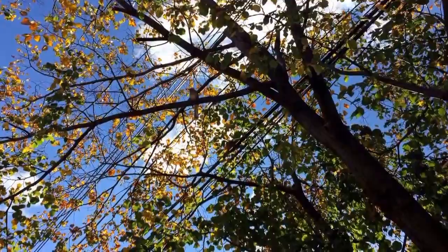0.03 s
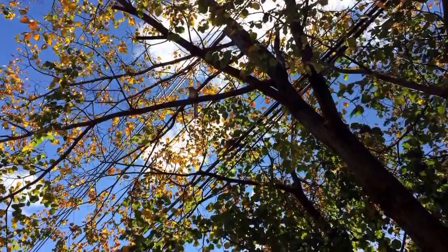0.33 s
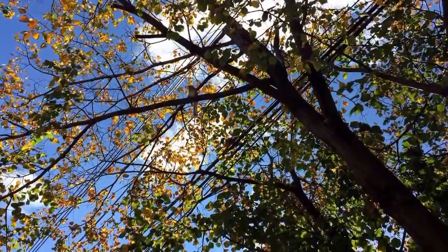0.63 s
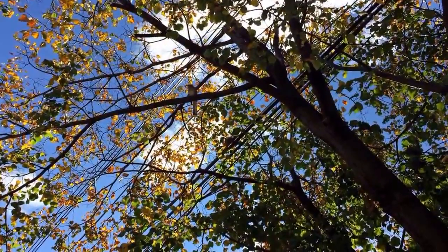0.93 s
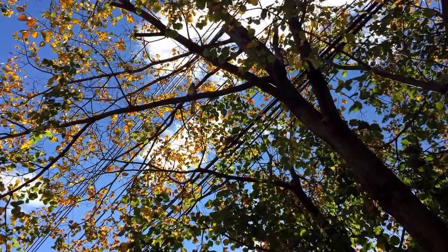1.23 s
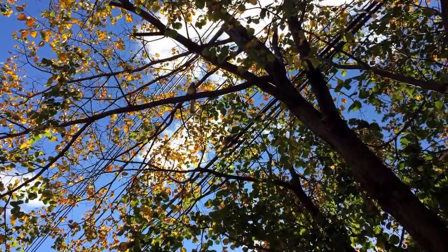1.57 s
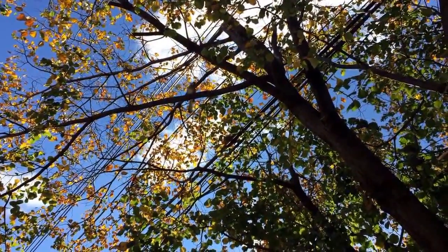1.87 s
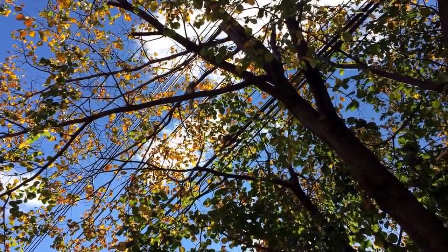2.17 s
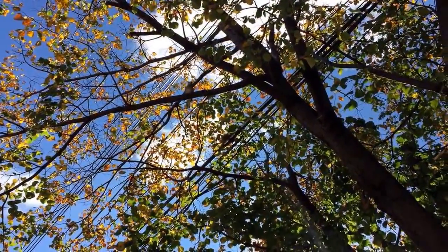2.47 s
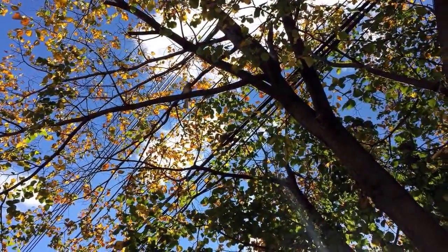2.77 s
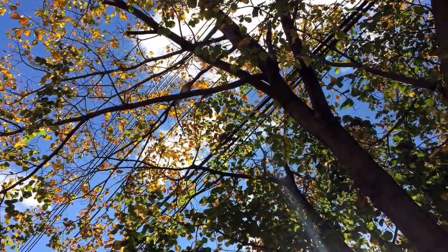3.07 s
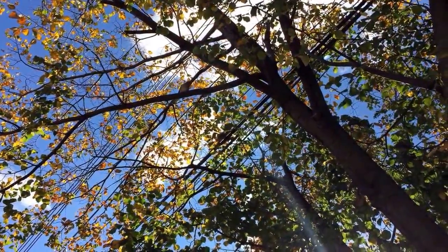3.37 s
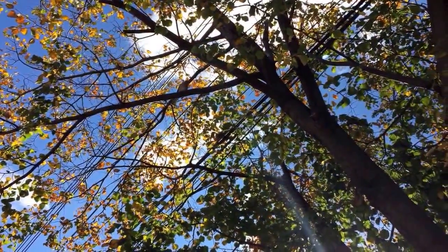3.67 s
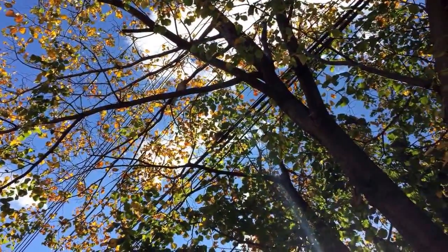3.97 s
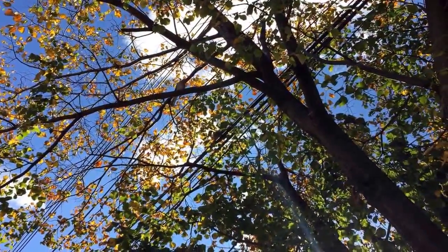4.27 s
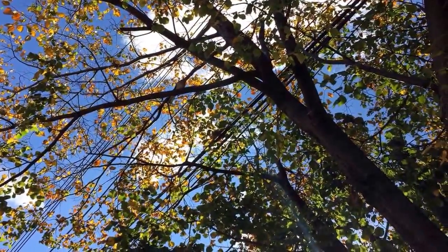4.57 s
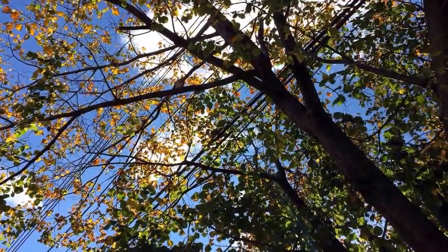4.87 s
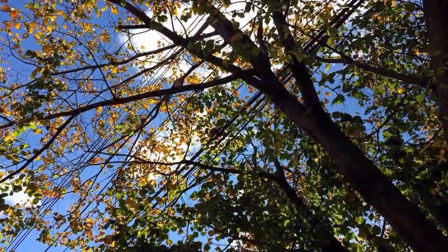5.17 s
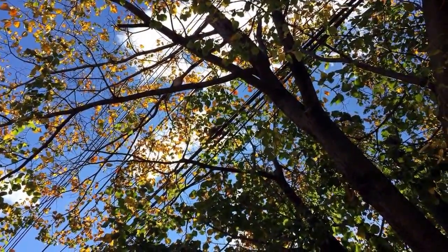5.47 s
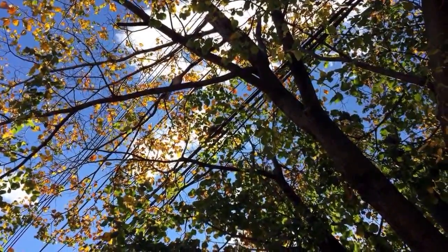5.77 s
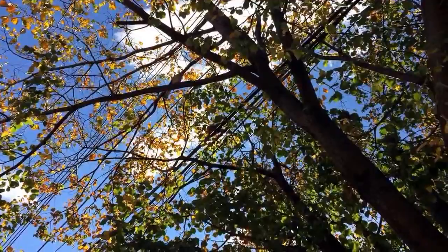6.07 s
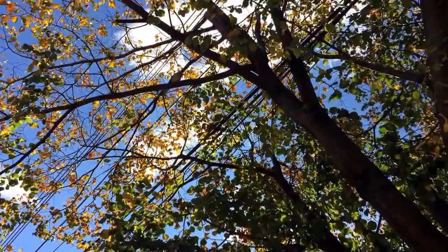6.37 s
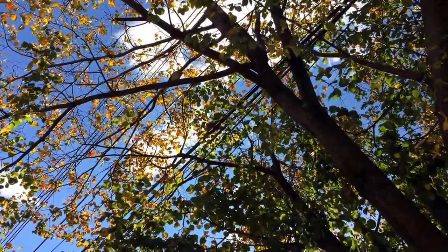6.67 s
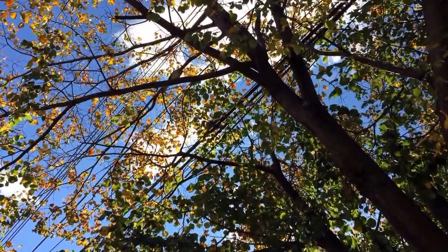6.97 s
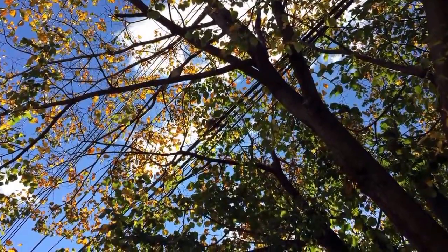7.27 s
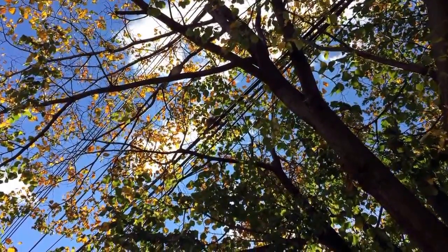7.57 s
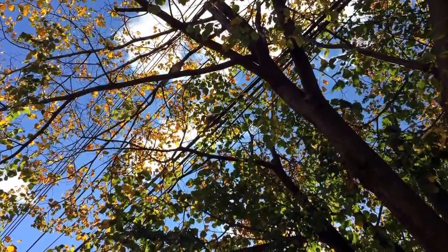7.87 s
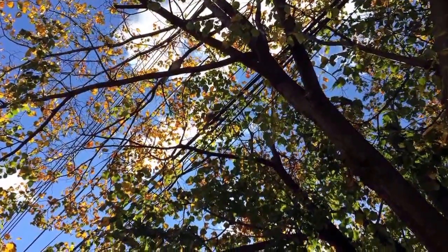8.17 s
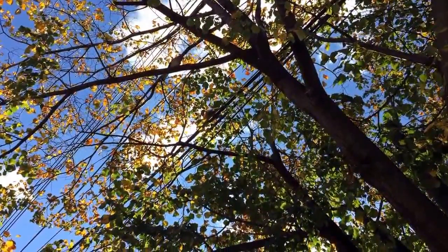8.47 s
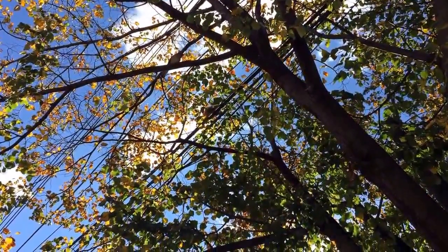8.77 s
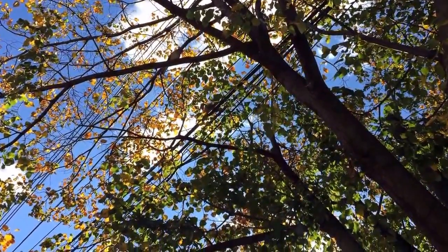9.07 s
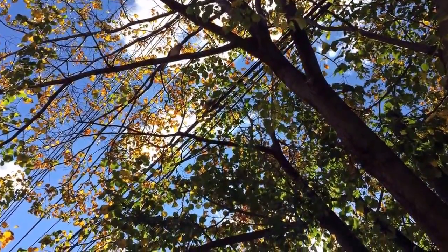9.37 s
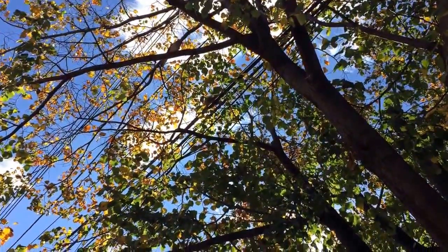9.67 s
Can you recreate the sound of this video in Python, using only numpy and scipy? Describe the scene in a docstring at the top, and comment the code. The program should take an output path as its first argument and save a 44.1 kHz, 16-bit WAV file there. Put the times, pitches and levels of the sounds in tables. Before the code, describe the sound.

On a city street, a vehicle accelerates away with a low hum and a rush of tyres while small songbirds chatter in the branches near the microphone. The chirps start busy, thin to single calls, then turn briefly nasal and end in a quick run. The engine shifts gear about halfway and sinks into soft traffic, where another motor swells faintly. The bright calls stay in front, echoing lightly off the houses.

```python
"""A city street, with small birds chattering in a tree. Their syrinx membranes glide through quick
whistles with thin bright overtones and scratchy catches, then a few nasal calls and a last flurry.
Branches scatter the calls and house fronts echo them. On the road an engine pulls away, its exhaust
humming at the firing rate, changes gear and fades into a bed of traffic; a second drones further off."""
import sys
import numpy as np
from scipy import signal
from scipy.fft import rfft, irfft, next_fast_len
from scipy.io import wavfile
from scipy.ndimage import uniform_filter1d, map_coordinates

SR = 44100
rng = np.random.default_rng(int(sys.argv[2]) if len(sys.argv) > 2 else 0)


def inscribe(sig):
    """Save sig as 16-bit PCM at rate SR to the path in sys.argv[1].

    A 1-D sig is mono; a 2-D sig holds one channel per row.
    Samples are clipped to [-1, 1] before scaling.
    """
    pcm = np.round(np.clip(np.atleast_2d(sig).T, -1, 1) * 32767)
    wavfile.write(sys.argv[1], SR, pcm.astype(np.int16))


N = 437031

# Table levels are set before each layer's trim.
# faders of the traffic bed: (time [s], rumble [dB], roar [dB], tyres [dB])
ROAD_FADERS = [(0, -55, -42, -38.5), (.66, -54.5, -40, -39), (2.12, -54, -51.5, -46.5),
               (4.91, -57.5, -53, -50), (6.12, -55.5, -53.5, -48.5), (8.46, -55.5, -55.5, -49.5),
               (9.9, -57, -54, -50)]
# tone of the city rumble, road roar and tyre noise: (frequency [Hz], level [dB])
RUMBLE_EQ = [(24, -26.5), (40, -12.5), (60, -1), (78, -1), (105, -5.5), (145, -3.5), (175, -9.5),
             (210, -6.5), (250, -12), (330, -19.5)]
ROAR_EQ = [(150, 1), (250, 1), (320, 0.5), (420, -1.5), (480, -5.5), (680, -2), (800, -13.5), (1100, -31.5)]
TYRE_EQ = [(500, -24.5), (750, 1), (950, 1), (1100, 3), (1280, 1), (1700, -0.5), (2500, -8.5), (3200, -20),
           (4300, -25.5), (5000, -39.5), (6800, -37), (8000, -54.5), (11000, -54.5), (15500, -47)]
# resonances of the departing vehicle's whirr: (frequency [Hz], width [Hz], level [dB])
WHIRR_MODES = [(437, 47, 1), (641, 31, 2), (709, 19, 4), (878, 27, 7.5), (955, 27, 5.5), (1259, 20, 6)]
# how hard it is driven: (time [s], whirr against the roar fader [dB])
ENGINE_LOAD = [(0, -1.5), (4.9, 2), (5.4, -25), (9.9, -3.5)]
# its revs climb, drop at the gear change and ease off: (time [s], firing rate [Hz])
ENGINE_REVS = [(0, 94), (.6, 106.7), (1.9, 117.6), (3.1, 126.8), (4.9, 137.4), (5.15, 135.4), (5.4, 108.1),
               (5.7, 102.2), (6.4, 99.8), (6.95, 86), (7.5, 95.7), (9.9, 89.7)]
# its exhaust faders: (time [s], firing tone [dB], overtones [dB])
ENGINE_FADERS = [(0, -36, -31), (.3, -28, -29.5), (.55, -27, -37.5), (.7, -32.5, -36.5), (1.5, -33, -36),
                 (2.1, -32.5, -44), (2.35, -41.5, -41.5), (3, -38.5, -52), (3.6, -35.5, -64),
                 (4.1, -39, -64), (5.05, -40.5, -65), (5.3, -42, -59), (5.62, -38.5, -50),
                 (6.2, -42, -53.5), (6.8, -40, -62), (7.15, -54, -59), (7.45, -45.5, -59),
                 (8.2, -59, -59.5), (9.9, -55.5, -56)]
# brief dips in the firing tone: (time [s], width [s], depth [dB])
FIRING_DIPS = [(1.35, 0.1, 13), (2.28, .04, 5.5), (2.78, 0.12, 15), (3.83, 0.076, 17)]
# exhaust overtones: (multiple of the firing rate, level [dB])
EXHAUST_ORDERS = [(.5, -26.5), (1.5, -1.5), (2, 0.5), (2.5, -10), (3, -16.5), (3.5, -25.5), (4, -19)]
# a second engine down the road: (time [s], firing rate [Hz], level [dB])
FAR_ENGINE = [(0, 60, -61), (3.5, 66, -54.5), (5.2, 71, -42.5), (5.8, 73, -44.5), (6.2, 75, -51),
              (7.2, 118, -62), (7.6, 130, -46.5), (8.1, 141, -47), (8.5, 143, -63), (9.9, 148, -53)]
# tone of the shrill overtones, bright near 6.7, 11.3 and 15.5 kHz with dips between:
# (frequency [Hz], gain [dB])
SHRILL_EQ = [(5200, -3.5), (6700, -3), (7800, -30), (9000, -13), (10200, -18.5), (11300, 3), (13500, -15.5),
             (14600, -3.5), (15500, 1)]
# tone of the husk under a note and of a catch's rasp: (frequency [Hz], level [dB])
HUSK_EQ = [(1800, -1.5), (2400, 11.5), (3000, 4), (4400, -4), (5500, -15), (7000, -16.5), (10000, -35),
           (15500, -26)]
RASP_EQ = [(1700, -22), (2300, 2), (3000, 8), (4400, -1.5), (5200, -15.5), (6700, -11.5), (8000, -19.5),
           (9000, -18.5), (10200, -34.5), (11500, -14), (13500, -21), (15500, -15)]
# texture of the calls: (time [s], hoarseness [dB], send to the branches [dB])
CALL_TEXTURE = [(0, -26, -7), (.85, -20, -4.5), (1.2, -34.5, -10), (4.5, -30, -5.5), (6.4, -33, -3.5),
                (7.8, -23.5, -0.5), (8.45, -16, -5.5), (9.1, -16, -5)]
# scooped and arched whistles: (start [s], length [s], first pitch [Hz], middle pitch [Hz],
# last pitch [Hz], level [dB], shrill overtones [dB], catch [dB])
BENT_NOTES = [(0.023, 0.039, 2410, 2680, 2360, -32, -20.5, -48),
              (0.25, .057, 2560, 2563, 3030, -31, -27, -39),
              (0.526, 0.089, 3510, 3196, 3410, -29, -30, -29),
              (0.624, 0.048, 2120, 2350, 2190, -27.5, -35.5, -44),
              (1.615, .05, 3020, 2880, 3140, -33, -27, -36),
              (1.703, 0.038, 2030, 1943, 2000, -29, -45, -50),
              (2.004, 0.058, 2760, 2310, 2470, -32, -43.5, -46),
              (5.926, 0.0405, 2043, 2290, 2290, -31.5, -34, -42),
              (8.432, 0.034, 3110, 3330, 4020, -34.5, -34, -35),
              (8.451, .022, 2400, 2880, 2390, -25, -47, -41)]
# whistles that slide and settle:
# (start [s], length [s], first pitch [Hz], last pitch [Hz], level [dB], shrill overtones [dB])
SLURRED_NOTES = [(0.23, 0.019, 2990, 2160, -30.5, -34), (0.318, 0.021, 2720, 2140, -26.5, -31),
                 (0.351, 0.025, 2790, 2350, -25.5, -27), (0.51, 0.015, 4460, 3410, -38, -36),
                 (.796, 0.017, 3490, 2910, -30.5, -29), (.824, 0.045, 3570, 2730, -31.5, -42),
                 (0.829, 0.039, 3970, 3650, -44, -37), (.869, 0.028, 2680, 2230, -31.5, -46),
                 (0.919, 0.026, 2560, 2503, -24, -39), (1.078, 0.021, 3500, 2327, -23.5, -39),
                 (1.104, .046, 2980, 2520, -24.5, -47), (1.664, 0.036, 2845, 2040, -29.5, -39),
                 (1.743, 0.097, 2044, 2327, -30, -42), (1.977, .025, 3290, 2830, -30, -34),
                 (2.35, 0.056, 3090, 3145, -32.5, -40), (2.399, 0.074, 2290, 1920, -35, -44),
                 (3.008, 0.042, 3080, 3145, -37, -35), (3.262, .031, 3420, 2500, -39.5, -40),
                 (3.527, 0.033, 3270, 2830, -32, -31.5), (4.363, 0.022, 3020, 2510, -41, -37),
                 (4.593, 0.025, 3810, 2610, -37, -37), (5.034, 0.019, 2970, 2610, -38.5, -38),
                 (5.276, 0.021, 3360, 2630, -34, -36), (5.594, 0.025, 2695, 2585, -39, -33),
                 (5.908, 0.022, 2820, 2560, -47, -35), (5.963, .042, 2367, 1972, -27.5, -33),
                 (7.388, 0.015, 2930, 2860, -28, -37), (7.781, 0.029, 2780, 2313, -30.5, -39)]
# calls that shoot up and drop back: (peak time [s], rise [s], fall [s], peak pitch [Hz],
# low pitch [Hz], rise level [dB], fall level [dB], shrill overtone level [dB])
PEAKED_NOTES = [(3.069, 0.033, 0.063, 2574, 1840, -37, -36, -77),
                (3.324, 0.024, 0.027, 2276, 1865, -34, -30.5, -75),
                (3.591, 0.026, 0.046, 3160, 1937, -31.5, -30.5, -64),
                (4.419, .026, 0.052, 2570, 1803, -28, -40, -70),
                (4.671, 0.034, 0.028, 2927, 1830, -27.5, -33.5, -58.5),
                (5.092, .022, 0.048, 2264, 1808, -29, -33.5, -60),
                (5.333, 0.022, 0.052, 2390, 1803, -30, -32.5, -63),
                (5.66, 0.029, 0.045, 2590, 1770, -28, -39, -60.5)]
# low notes that break into a high slur: (break time [s], low length [s], low pitch [Hz],
# low level [dB], slur length [s], first pitch [Hz], last pitch [Hz], slur level [dB])
YODEL_NOTES = [(6.348, 0.057, 2155, -31.5, 0.035, 3070, 2386, -28),
               (6.499, 0.034, 2204, -35.5, 0.058, 2910, 2642, -30.5),
               (6.864, .059, 2165, -34, 0.043, 2735, 2502, -33),
               (7.146, 0.069, 2117, -34, 0.051, 2550, 2417, -32.5)]
# wavering nasal calls: (start [s], length [s], first pitch [Hz], pitch at one third [Hz],
# pitch at two thirds [Hz], last pitch [Hz], level [dB], octave overtone [dB])
NASAL_NOTES = [(7.31, 0.084, 1957, 2150, 2330, 1970, -40, -3),
               (7.472, 0.11, 2210, 2310, 2190, 2340, -39.5, -3),
               (7.698, .078, 2010, 2020, 2040, 2060, -37, -17)]
# the flurry's chips:
# (peak time [s], peak pitch [Hz], low pitch [Hz], level [dB], after-note delay [s], after-note [dB])
FLURRY_CHIPS = [(8.58, 3750, 2023, -32, .025, -36), (8.684, 3364, 1940, -32.5, 0.032, -31.5),
                (8.796, 3050, 1970, -32, 0.032, -34.5), (8.908, 3570, 2205, -31, .03, -27.5),
                (9.022, 4100, 2046, -34, 0.027, -31.5)]
# reverb between the house fronts: (frequency [Hz], time to decay by 60 dB [s])
STREET_DECAY = [(500, 0.68), (2500, 0.54), (4500, 0.47), (12000, 0.69)]

SETTLE_S = .029  # time constant of a slur's glide


def amp(db):
    """Decibels to gain."""
    return 10 ** (np.asarray(db) / 20)


def unit(x):
    """Scale to rms 1."""
    return x / np.sqrt(np.mean(x ** 2) + 1e-20)


def along(points, hz):
    """Read (frequency [Hz], value) points on a log axis."""
    freqs, values = np.transpose(points)
    return np.interp(np.log(hz + 1), np.log(freqs + 1), values)


def automation(rows):
    """One lane, a value per sample, for each column after the time."""
    times, *columns = np.transpose(rows)
    return [np.interp(np.arange(N) / SR, times, column) for column in columns]


def wobble(rate, size=N):
    """A smooth random modulator, rate knots a second."""
    knots = rng.standard_normal(int(size * rate / SR) + 4)
    return map_coordinates(knots, [np.arange(size) * rate / SR])


def filtered(x, response):
    """EQ x with a gain given as a function of frequency."""
    size = next_fast_len(N + SR // 2)
    return irfft(rfft(x, size) * response(np.fft.rfftfreq(size, 1 / SR)), size)[:N]


def rush(eq, patchy_db=1.2):
    """Coloured noise of rms 1 with drifting patches, rolled off beyond the ends of its EQ."""
    bins = signal.stft(rng.standard_normal(N), nperseg=1024)[2]
    patches = uniform_filter1d(rng.standard_normal(bins.shape), size=3, axis=0)
    patches = uniform_filter1d(patches, size=25, axis=1)
    noise = signal.istft(bins * amp(patchy_db * unit(patches)), nperseg=1024)[1][:N]
    closed = [(eq[0][0] / 2, -120), *eq, (eq[-1][0] * 2, -120)]
    return unit(filtered(noise, lambda hz: amp(along(closed, hz))))


def add(track, s, sound):
    """Mix a sound into the track at time s."""
    i = max(round(s * SR), 0)
    track[i:i + len(sound)] += sound[:len(track) - i]


def gate(t, length, attack, release):
    """Soft fades centred on the start and end of a note."""
    edges = np.clip(.5 + t / attack, 0, 1) * np.clip(.5 + (length - t) / release, 0, 1)
    return np.sin(np.pi / 2 * edges) ** 2


def slide(first_hz, last_hz, length, settle_s):
    """Five pitches along a glide that moves fast and then settles."""
    left = np.exp(-np.linspace(0, length, 5) / settle_s)
    return last_hz * (first_hz / last_hz) ** ((left - left[-1]) / (1 - left[-1]))


def traffic():
    """The bed: city rumble, road roar, tyres, faint hiss and a whirr that ducks at the gear change."""
    def resonances(hz):
        modes = sum(amp(db) * 1j * hz * width / (centre ** 2 - hz ** 2 + 1j * hz * width)
                    for centre, width, db in WHIRR_MODES)
        return modes / (1 + (hz / 1800) ** 4)

    rumble_db, roar_db, tyre_db = automation(ROAD_FADERS)
    load_db, = automation(ENGINE_LOAD)
    rumble = amp(rumble_db + 11) * rush(RUMBLE_EQ, patchy_db=1)
    roar = amp(roar_db + 1.15) * rush(ROAR_EQ)
    tyres = amp(tyre_db - 1.5) * rush(TYRE_EQ)
    whirr = amp(roar_db + load_db) * unit(filtered(rng.standard_normal(N), resonances))
    hiss = amp(-76.5) * rush([(3000, -.5), (6500, -2.5), (9000, -7), (15500, -14)], patchy_db=.3)
    return rumble + roar + whirr + tyres + hiss


def departing_engine(unsteady=.01185, flutter_db=3.5, firing_trim_db=-2, overtone_trim_db=-3):
    """Exhaust tones stacked on the firing rate; unequal cylinders add the half orders."""
    hz, = automation(ENGINE_REVS)
    firing_db, overtone_db = automation(ENGINE_FADERS)
    t = np.arange(N) / SR
    dips_db = sum(db * np.exp(-((t - s) / width) ** 2) for s, width, db in FIRING_DIPS)
    # as it leaves, reflections make the tone waver more and more
    distance = np.linspace(0, 1, N)
    pitch_waver = unsteady * (.5 + 3 * distance) * wobble(35)
    waver_db = (2.27 + 2.5 * distance) * wobble(16)
    phase = 2 * np.pi * np.cumsum(hz * (1 + pitch_waver)) / SR
    exhaust = amp(firing_db - dips_db + firing_trim_db + waver_db) * np.sin(phase)
    for multiple, db in EXHAUST_ORDERS:
        level_db = overtone_db + overtone_trim_db + db + flutter_db * wobble(11)
        exhaust += amp(level_db) * np.sin(multiple * phase + rng.uniform(0, 2 * np.pi))
    return np.sqrt(2) * exhaust


def far_engine(unsteady=.023, flutter_db=3):
    """A background drone: only the wavering firing tone carries this far."""
    hz, db = automation(FAR_ENGINE)
    level = amp(db + flutter_db * wobble(7.9))
    phase = 2 * np.pi * np.cumsum(hz * (1 + unsteady * wobble(30))) / SR
    return level * np.sin(phase)


def syrinx(length, pitches, swell, octave_db, shrill_db, lead_s, jitter=.01, flutter_db=3.06, fuzz=.23):
    """A gliding membrane tone with fuzzy overtones, and its envelope; negative swell fades it."""
    t = np.arange(int((length + 2 * lead_s) * SR)) / SR - lead_s
    size = len(t)
    progress = np.clip(t / length, 0, 1)
    glide = np.polyfit(np.linspace(0, 1, len(pitches)), np.log(pitches), len(pitches) - 1)
    # wide slurs are unsteady, held notes are cleaner
    roughness = np.clip(np.ptp(np.log(pitches)) * 4, .5, 1)
    hz = np.exp(np.polyval(glide, progress) + jitter * roughness * wobble(897, size))
    phase = 2 * np.pi * np.cumsum(hz) / SR
    # the octave is muffled once it climbs above the throat's resonance
    muffle = amp(-9 * np.clip(np.log2(2 * hz / 5000), 0, 1))
    overtones = amp(octave_db + flutter_db * wobble(180, size)) * muffle * np.sin(2 * phase)
    for k in range(3, 9):
        partial = np.sin(k * phase) + fuzz * roughness * wobble(1800, size) * np.cos(k * phase)
        # a nasal call with a strong octave has its weight in the lower overtones
        nasal_db = amp(min(octave_db, 0)) * min(5 - k, 1) * 6
        level_db = shrill_db + nasal_db + along(SHRILL_EQ, k * hz) + 3.1 * wobble(150, size)
        overtones += amp(level_db) * (k * hz < SR / 2) * partial
    overtones *= gate(t, length, attack=.068, release=.0079)  # they bloom just after the tone
    # even notes are arched; strongly swelling or fading ones peak at one end
    arch_db = 7 * np.exp(-abs(swell) / 7) * np.sin(np.pi * progress)
    ramp_db = 1.66 * swell * (progress - .5)
    pressure = amp(ramp_db + arch_db + flutter_db * wobble(168.4, size))
    pressure *= gate(t, length, attack=.011, release=.0053)
    pressure /= np.sqrt(np.sum(pressure ** 2) / (length * SR))
    return (np.sin(phase) + overtones) * pressure, pressure


def branches(call, send_db, spread_s=.016, decay_s=.022, count=40):
    """Early reflections off limbs, ground and walls, different from every perch."""
    paths = np.zeros(SR // 10)
    delays = np.minimum(.002 + rng.exponential(spread_s, count), .09)
    paths[(delays * SR).astype(int)] = rng.standard_normal(count) * np.exp(-delays / decay_s)
    paths *= amp(send_db) / np.linalg.norm(paths)
    paths[0] = 1  # the direct sound
    return signal.fftconvolve(call, paths)


def birds(notes, lead_s=.008, trim_db=3, rasp_trim_db=13, catch_half_s=.018):
    track = np.zeros(N)
    hoarse_db, send_db = automation(CALL_TEXTURE)
    husk = amp(hoarse_db) * rush(HUSK_EQ)
    rasp = rush(RASP_EQ, patchy_db=4.5)
    for s, length, pitches, db, swell, octave_db, shrill_db, catch in notes:
        i = int(s * SR)
        tone, pressure = syrinx(length, pitches, swell, octave_db, shrill_db, lead_s)
        note = tone + pressure * husk[i:i + len(tone)]
        add(track, s - lead_s, amp(db + trim_db) * branches(note, send_db[i]))
        if catch:  # the membranes slap irregularly for a moment
            catch_s, catch_db = catch
            size = int(2 * catch_half_s * SR)
            slaps = np.hanning(size) ** 2 * amp(3.3 * wobble(603, size))
            scratch = branches(slaps * rasp[i:i + size], send_db[i])
            add(track, catch_s - catch_half_s, amp(db + catch_db + rasp_trim_db) * scratch)
    return track


def bends(swell=-1, octave_db=-32):
    """Scooped and arched whistles with a scratchy tail."""
    for s, length, *pitches, db, shrill_db, catch_db in BENT_NOTES:
        yield s, length, pitches, db, swell, octave_db, shrill_db, (s + .82 * length, catch_db)


def street_reverb(send, predelay_s=.025):
    """A short diffuse tail between the house fronts, driest around 4.5 kHz."""
    hz, t, bins = signal.stft(rng.standard_normal(SR), SR, nperseg=256)
    decay = amp(-60 * t / along(STREET_DECAY, hz)[:, None])
    tail = signal.istft(bins * decay, SR, nperseg=256)[1]
    tail = np.pad(tail / np.linalg.norm(tail), (int(predelay_s * SR), 0))
    return signal.fftconvolve(send, tail)[:N]


def wall_echo(calls, predelay_s=.11, level_db=-24.5, blur_s=.035):
    """Slapback from the house fronts across the street, blurred by many paths."""
    t = np.arange(SR // 2) / SR
    paths = rng.standard_normal(len(t)) * t * np.exp(-t / blur_s)
    track = np.zeros(N)
    add(track, predelay_s, amp(level_db) * signal.fftconvolve(calls, paths / np.linalg.norm(paths)))
    return track


def slurs(swell_per_octave=13, octave_db=-32.5, catch_db=-37):
    """Sliding whistles with a scratchy attack; the further they fall, the more they swell."""
    for s, length, first_hz, last_hz, db, shrill_db in SLURRED_NOTES:
        pitches = slide(first_hz, last_hz, length, SETTLE_S)
        swell = swell_per_octave * np.log2(first_hz / last_hz) * min(SETTLE_S / length, 1)
        yield s, length, pitches, db, swell, octave_db, shrill_db, (s + .003, catch_db)


def peaked_calls(rise_bend_s=.03, fall_bend_s=.0097, swell=8, fade=-6,
                 rise_octave_db=-32, fall_octave_db=-57, catch_db=-38):
    """The voice swells up to a cusp, catches, then drops and fades."""
    for s, rise, fall, peak_hz, low_hz, rise_db, fall_db, shrill_db in PEAKED_NOTES:
        up = slide(peak_hz, 1.04 * low_hz, rise, rise_bend_s)[::-1]
        down = slide(peak_hz, low_hz, fall, fall_bend_s)
        yield s - rise, rise, up, rise_db, swell, rise_octave_db, shrill_db - rise_db, (s, catch_db)
        yield s, fall, down, fall_db, fade, fall_octave_db - fall_db, shrill_db - fall_db, None


def yodels(gap_s=.0043, sag=(1.025, 1.005, .94), swell=5, fade=-2, catch_db=-31,
           low_octave_db=-29, low_shrill_db=-33.5, high_octave_db=-35, high_shrill_db=-29):
    """The low note sags as it swells, then the voice flips up with a catch."""
    for s, low_s, low_hz, low_db, high_s, first_hz, last_hz, high_db in YODEL_NOTES:
        held = low_hz * np.array(sag)
        slur = slide(first_hz, last_hz, high_s, SETTLE_S)
        yield s - gap_s - low_s, low_s, held, low_db, swell, low_octave_db, low_shrill_db, None
        yield s, high_s, slur, high_db, fade, high_octave_db, high_shrill_db, (s, catch_db)


def nasal_calls(swell=1, shrill_db=-23, catch_db=-17):
    """Held notes rich in overtones; the more nasal, the harsher the closing catch."""
    for s, length, *pitches, db, octave_db in NASAL_NOTES:
        catch = (s + length, catch_db + octave_db / 2)
        yield s, length, pitches, db, swell, octave_db, shrill_db, catch


def flurry(rise_s=.014, fall_s=.032, after_s=.022, hook=(.89, .97, .98), after_hz=(3200, 2560, 2250),
           rise_db=-2.5, swell=9, fade=-4, after_fade=-7,
           octave_db=-26, fall_octave_db=-17, shrill_db=-39, catch_db=-29):
    """Quick chips: a short climb, a steep fall, and an after-note that opens with a catch."""
    for s, peak_hz, low_hz, db, delay, after_db in FLURRY_CHIPS:
        up = peak_hz * np.array(hook)
        down = slide(peak_hz, low_hz, fall_s, settle_s=.02)
        catch = (s + delay, catch_db)
        yield s - rise_s, rise_s, up, db + rise_db, swell, octave_db, shrill_db, None
        yield s, fall_s, down, db, fade, fall_octave_db, shrill_db, None
        yield s + delay, after_s, after_hz, after_db, after_fade, octave_db, shrill_db, catch


def scene(dull_hz=3600, reverb_send_db=-24.5):
    """The mono mix: birds up front, their echo and reverb dulled by distance, the road behind."""
    calls = birds([*slurs(), *bends(), *peaked_calls(), *yodels(), *nasal_calls(), *flurry()])
    dulled = filtered(calls, lambda hz: 1 / (1 + (hz / dull_hz) ** 6))
    space = wall_echo(dulled) + street_reverb(amp(reverb_send_db) * dulled)
    return (calls + space + departing_engine() + far_engine() + traffic())[None]


def record(dry, cutoff_hz=15870, edge_hz=200):
    """A steep high cut on the master takes off the topmost air."""
    high_cut = lambda hz: np.clip((cutoff_hz - hz) / edge_hz + .5, 0, 1)
    return np.array([filtered(channel, high_cut) for channel in dry])


dry = scene()
out = record(dry)
inscribe(out)
```